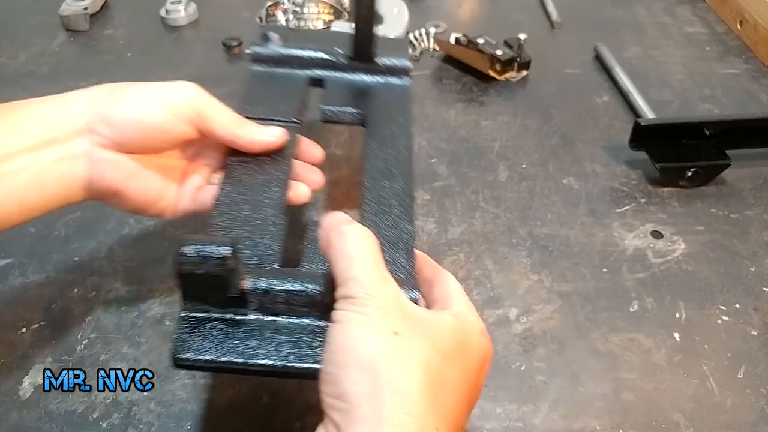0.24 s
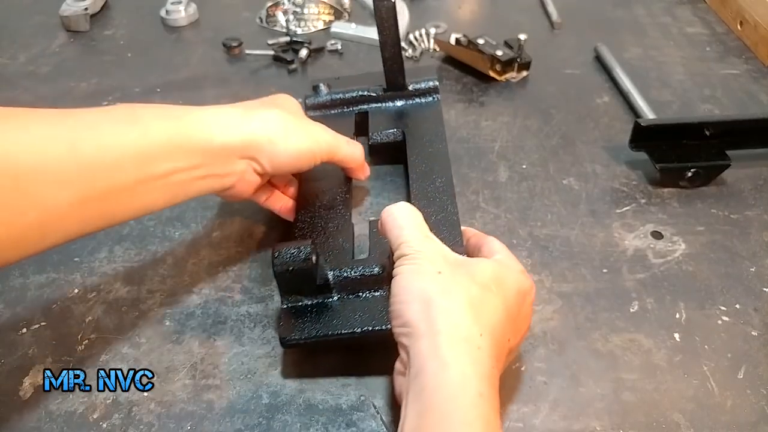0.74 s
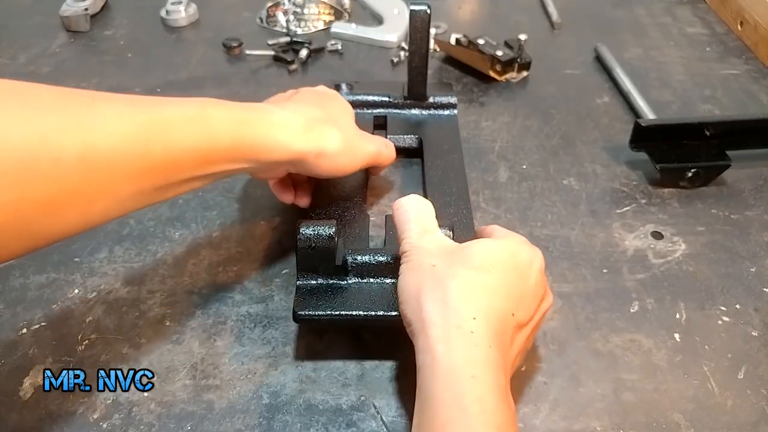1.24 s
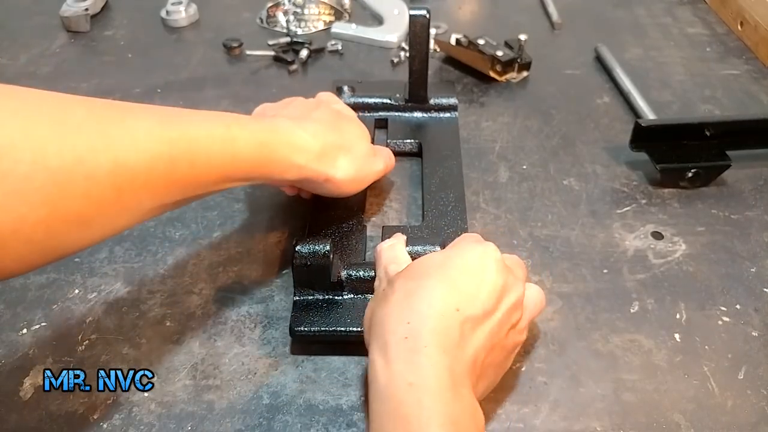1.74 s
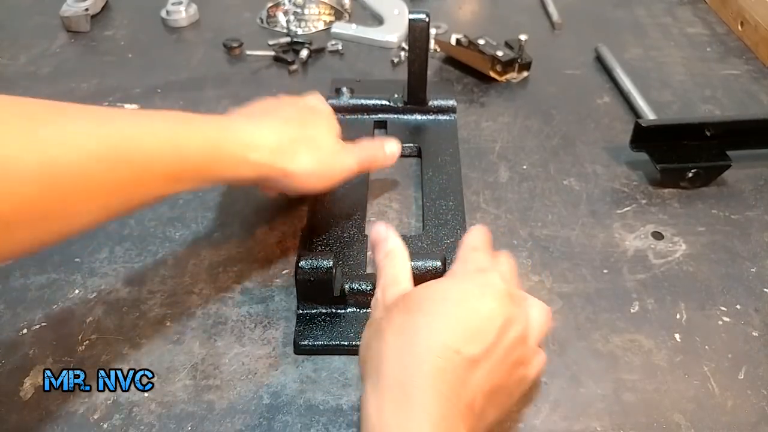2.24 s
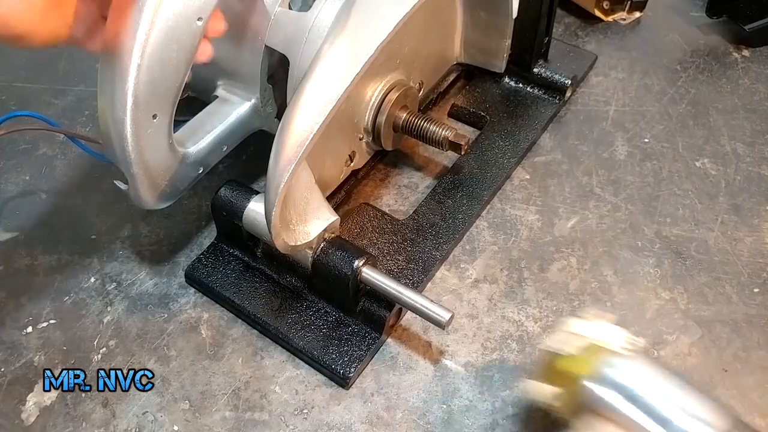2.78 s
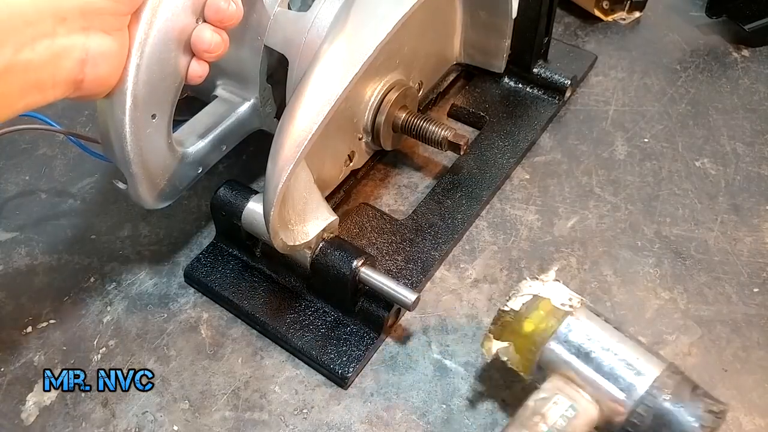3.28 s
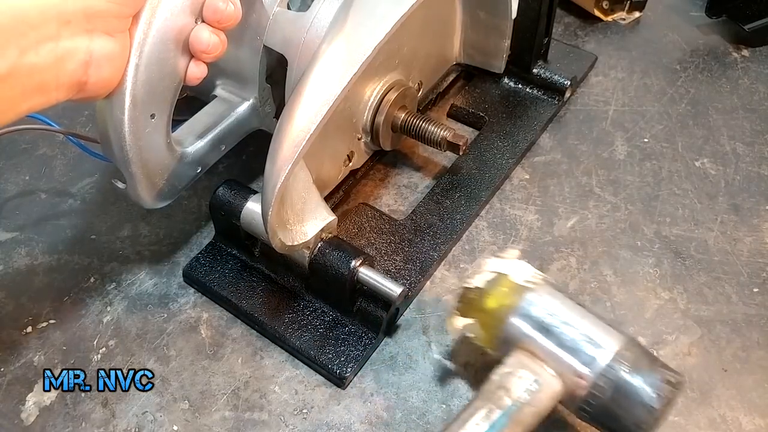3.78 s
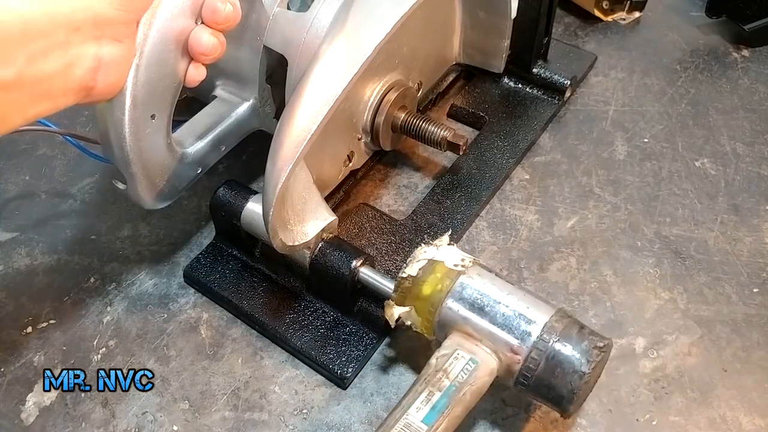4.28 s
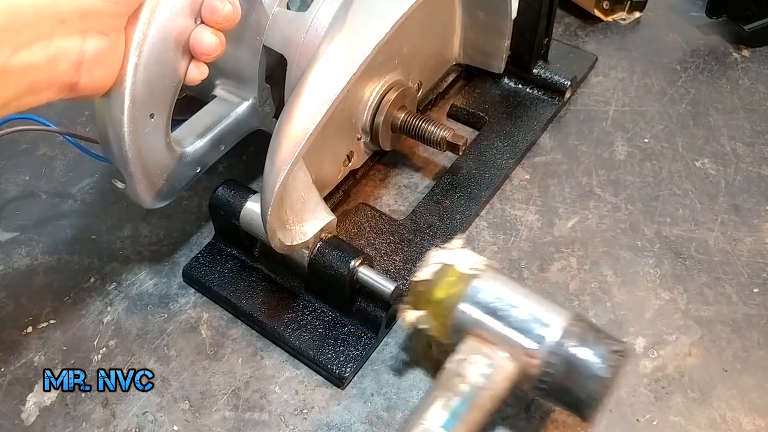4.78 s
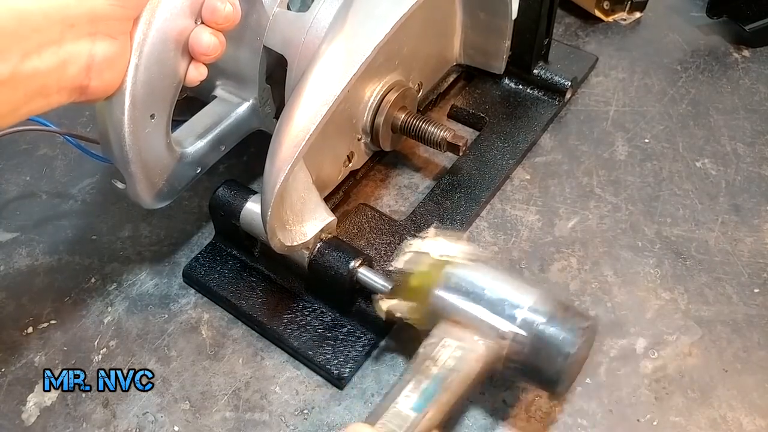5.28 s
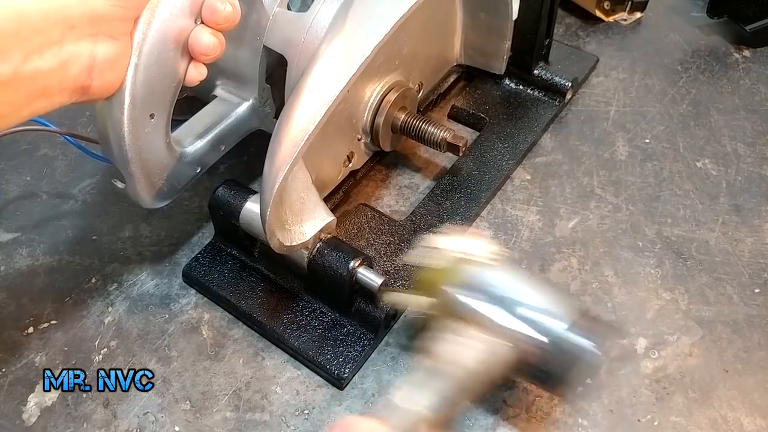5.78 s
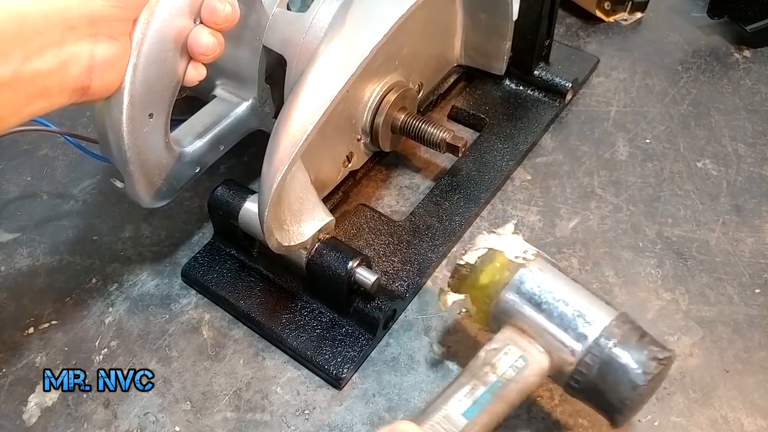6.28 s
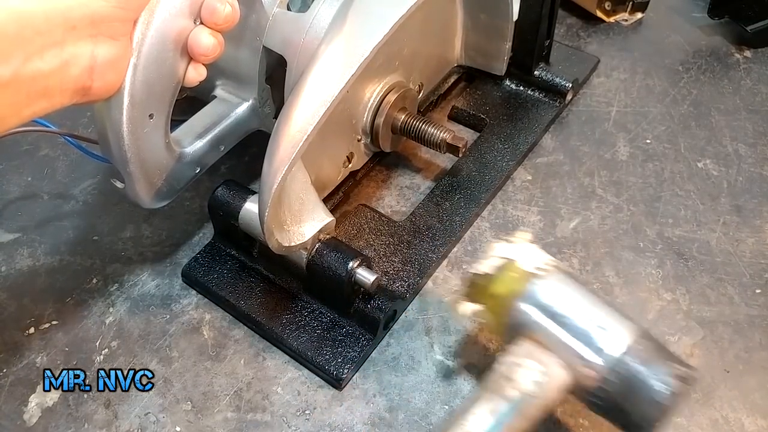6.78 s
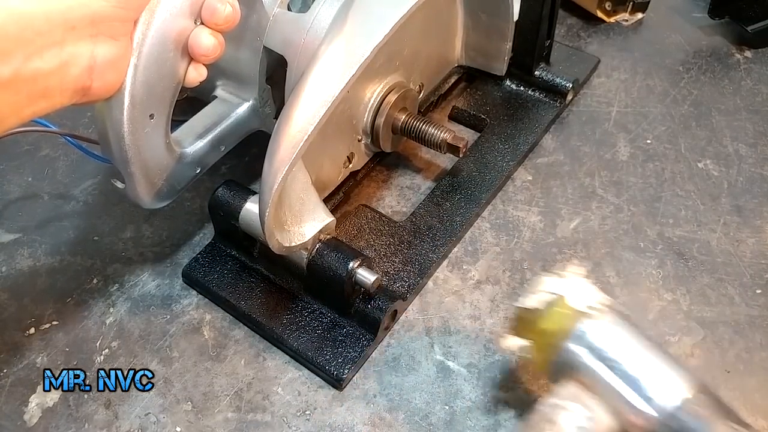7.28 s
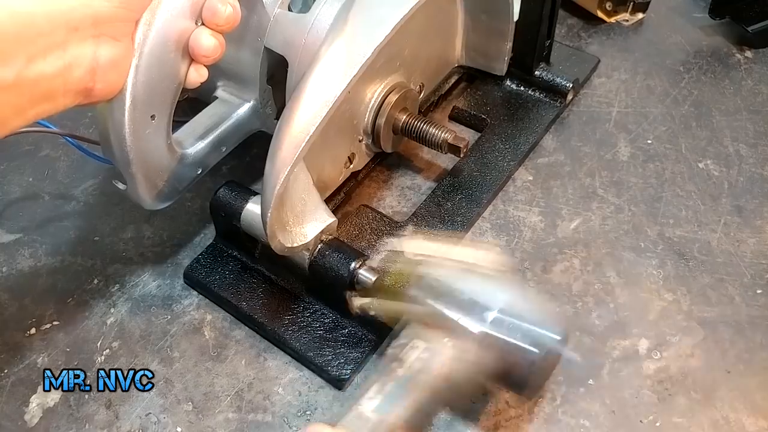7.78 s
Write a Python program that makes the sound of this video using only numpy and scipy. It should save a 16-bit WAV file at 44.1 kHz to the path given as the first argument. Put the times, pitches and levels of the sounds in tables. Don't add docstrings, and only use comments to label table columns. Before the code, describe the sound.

A heavy iron base scrapes and clinks on a gritty bench as a lorry drones past, then a mallet thumps a steel pin in.

```python
import sys
import numpy as np
from scipy import signal
from scipy.fft import rfft, irfft, next_fast_len
from scipy.io import wavfile
from scipy.ndimage import uniform_filter1d, minimum_filter1d, map_coordinates

SR = 44100
rng = np.random.default_rng(int(sys.argv[2]) if len(sys.argv) > 2 else 0)


def how_loud(loudness_db):
    steps = np.asarray(loudness_db, float) / 20
    return 10 ** steps


def wrap_up_sound(samples):
    columns = np.atleast_2d(samples).T
    tamed = np.clip(columns, -1, 1)
    steps = np.round(tamed * 32767).astype(np.int16)
    wavfile.write(sys.argv[1], SR, steps)


N = 354563

# start in seconds, peak in dB, dull thump in dB, bright click in dB.
BLOWS = [(2.927, -20.5, -4, -3), (3.198, -28.5, 8.5, -16), (3.448, -40.5, 20.5, 9), (3.7057, -29, 16, 8),
         (3.9568, -25.5, 16, 17.5), (4.2027, -11.5, 7.5, -4), (4.6547, -12, -1.5, 7.5),
         (5.0453, -13.5, 2.5, 2), (5.334, -14.5, 5, 2.5), (5.6107, -15.5, 2.5, 4), (5.88, -17, 2, 6),
         (6.142, -15, -4, 1), (6.3987, -19.5, 8, 16), (6.6678, -15, 4, 10.5), (7.5416, -16, 1, 12),
         (7.9034, -9, 2, 11.5)]
PAUSE_S = 2.352, 2.392


def at_hz(points, hz):
    point_hz, point_db = np.transpose(points)
    return np.interp(np.log(hz), np.log(point_hz), point_db)


def in_time(rows):
    s, db = np.transpose(rows)
    return np.interp(np.arange(N) / SR, s, db)


def swell(crest_s, crest_db, rise_db_per_s, fall_db_per_s):
    t = np.arange(N) / SR - crest_s
    return crest_db + np.where(t < 0, rise_db_per_s * t, -fall_db_per_s * t)


def coloured(x, spectrum):
    size = next_fast_len(len(x))
    hz = np.maximum(np.arange(size // 2 + 1) * SR / size, 1)
    y = irfft(rfft(x, size) * how_loud(at_hz(spectrum, hz)), size)[:len(x)]
    return y / np.std(y)


def band(x, low_hz, high_hz):
    return signal.sosfilt(signal.butter(2, [low_hz, high_hz], "band", fs=SR, output="sos"), x)


def drift(rate_hz):
    knots = rng.standard_normal(1300)
    return map_coordinates(knots, [np.minimum(np.arange(N) / SR * rate_hz, 1290)], order=3)


def ring(force, hz, t60_s):
    r, w = how_loud(-60 / (t60_s * SR)), 2 * np.pi * hz / SR
    return signal.lfilter([0, np.sin(w)], [1, -2 * r * np.cos(w), r * r], force + 1e-18)


def struck(times_s, levels_db, modes, spread_db, soft=False):
    at, out = np.round(times_s * SR).astype(int), np.zeros(N)
    chance = rng.standard_normal((len(at), len(modes)))
    for k, (hz, mode_db, t60_s) in enumerate(modes):
        force = np.zeros(N)
        force[at] = how_loud(levels_db + mode_db + spread_db * chance[:, k])
        ringing = ring(force, hz, t60_s)
        if soft:
            ringing = ring(ringing, hz, t60_s) * 37 / (t60_s * SR)
        out += ringing
    return out


def pin():
    # Hz, level in dB, t60 in seconds.
    thump_modes = [(463.5, -2, 0.24), (680, 15.5, 0.017), (960, 6, 0.011), (1656, 1, 0.036)]
    knock_modes = [(1850, -9, 0.0079), (2500, 0.5, 0.0055), (3270, -5, 0.0047)]
    loose_modes = [(1730, -1, 0.0073), (2400, -4.5, 0.013), (3600, -11, .01)]
    click_modes = [(4710, -2.5, 0.0055), (5670, -1, 0.0026), (6440, -6, 0.0094), (7950, -5.5, 0.0039),
                   (9060, -12.5, 0.009), (11140, -39.5, 0.0046)]
    loose_blows = 5
    s, db, thump_db, click_db = np.transpose(BLOWS)
    knock_s, knock_db = s + .0003, db + 5
    thump = struck(s, db + thump_db - 15.5, thump_modes, 2.4)
    loose = struck(knock_s[:loose_blows], knock_db[:loose_blows], loose_modes, 2, soft=True)
    knock = struck(knock_s[loose_blows:], knock_db[loose_blows:], knock_modes, 2, soft=True)
    click = struck(s + .001, db + click_db - 4, click_modes, 2, soft=True)
    return thump + loose + knock + click


def base():
    shoved_s = [.96, 1.1658, 1.419, 1.4725, 1.548, 1.86, 1.885, 1.9013, 1.921, 2.1045, 2.119, 2.29, 6.111,
                6.341, 7.865]
    # hiss in dB, length in seconds, grind in dB, bench in dB.
    shoves = [(-41, 0.32, -25, -44), (0.5, .15, -4, -19.5), (-31, 0.053, -55, -34),
              (-15, 0.083, -32, -16.5), (-24.5, 0.087, -55, -24), (-37, 0.2, -40, -48),
              (-31, .015, -60, -60), (-29.5, 0.023, -60, -58), (-30, 0.033, -55, -60),
              (-17.5, 0.033, -50, -39), (-6.5, 0.18, -9.5, -13), (-40, 0.058, -45, -21),
              (-37, .011, -58, -50), (-29.5, 0.057, -57, -44), (-52, 0.038, -37, -55)]
    # start in seconds, hiss in dB, length in seconds,
    # grind above hiss in dB, bench in dB.
    drives = [(2.9254, -20.5, 0.064, 3, -36), (3.199, -27.5, 0.05, 3, -34), (3.449, -28.5, 0.054, 5, -29.5),
              (3.712, -18, 0.088, 3.5, -18), (3.965, -3.5, 0.04, 4, -22), (4.202, -2.5, 0.14, 1, -12.5),
              (4.653, -19.5, 0.1, 8.5, -25), (5.048, -22, .11, 8, -22.5), (5.332, -24.5, 0.097, 10, -24.5),
              (5.613, -27, 0.064, 11, -22.5), (5.882, -27, 0.074, 9.5, -24), (6.144, -12, 0.13, 4.5, -12.5),
              (6.405, -2, 0.13, 0, -12.5), (6.673, 1, 0.12, -0.5, -9.5), (7.545, 8.5, 0.12, -2, -4.5),
              (7.903, 2.5, 0.16, -1.5, -5.5)]
    # Hz, level in dB per Hz.
    hiss_spectrum = [(2060, -10), (3500, -8.5), (4000, -12.5), (5310, -6), (6040, -4.5), (8160, -1.5),
                     (10100, -19.5), (15300, -34), (16200, -37)]
    grind_spectrum = [(120, 9), (200, 0), (241, -10), (736, -11), (1010, -10.5), (1230, -2.5), (2220, -14),
                      (4000, -11.5), (5200, -40), (8800, -120)]
    # Hz, level in dB, t60 in seconds.
    bench_modes = [(104.8, 6.5, 0.27), (133.9, 4, 0.16), (195.3, 3.5, 0.5), (282.5, 2.5, 0.28),
                   (350, 7.5, 0.46), (452, -8, 0.51)]
    casting_modes = [(497.4, -44, 0.16), (775, -38, 0.055), (979, -29, 0.015), (1690, -66, 0.068),
                     (2530, -67, 0.049), (3600, -52, 0.04)]

    t, hiss, grind, drum = np.arange(N) / SR, np.zeros(N), np.zeros(N), np.zeros(N)
    skids = [(s, *row) for s, row in zip(shoved_s, shoves)]
    skids += [(s, db, length_s, db + more_db, drum_db) for s, db, length_s, more_db, drum_db in drives]
    for k, (s, hiss_db, length_s, grind_db, drum_db) in enumerate(skids):
        jolt = min(how_loud(0.17 * hiss_db), 1) if k < len(shoves) else 0.23
        i = slice(round(s * SR), round((s + length_s) * SR))
        since_s = t[i] - s
        rise_s = 0.0061 * (10 * length_s) ** 2
        speed_up = np.clip(since_s / max(rise_s, .001), jolt, 1)
        speed = speed_up * np.clip(1 - since_s / length_s, 0, 1) ** 2.64
        hiss[i] += how_loud(hiss_db) * speed
        grind[i] += how_loud(grind_db) * speed
        drum[i] += how_loud(drum_db) * speed

    grit = rng.standard_normal((3, N)) * how_loud(1.96 * rng.exponential(1, (3, N)))
    bounce = np.sin(2 * np.pi * bench_modes[1][0] * t)
    push = drum * (grit[2] / np.std(grit[2]) + 0.5 * bounce)
    bench = sum(how_loud(db - 48.5) * ring(push, hz, t60_s) for hz, db, t60_s in bench_modes)
    hissing = (1 + 0.091 * bounce) * hiss * coloured(grit[0], hiss_spectrum)
    grinding = grind * coloured(grit[1], grind_spectrum)
    casting = sum(how_loud(db) * ring(grinding, hz, t60_s) for hz, db, t60_s in casting_modes)
    return hissing + grinding + casting, bench


def parts():
    # start in seconds, peak in dB.
    clinks = [
        (1.4192, -30),
        (1.4734, -8),
        (1.8851, -33),
        (1.9013, -28),
        (1.92, -27),
    ]
    # Hz, level in dB, t60 in seconds.
    part_modes = [(3360, -4, 0.022), (4130, -0.5, 0.09), (5340, -6, 0.02), (6460, -4, .02), (7900, 11, .04),
                  (8630, 17, 0.032), (9300, 4, .05), (11300, -15, .04)]
    pin_modes = [(730, -5, .09), (2440, -8, .06), (3490, 3.5, .05), (4230, -16, 0.072), (5030, -6, .06),
                 (7550, -6, .05), (8170, 4, .06), (10400, -4, 0.06)]
    pin_ring_db = [-25, -29.5, -33.5]
    s, db = np.transpose(clinks)
    taps_s = np.array(BLOWS)[:len(pin_ring_db), 0] + .001
    return struck(s, db - 24, part_modes, 4) + struck(taps_s, np.array(pin_ring_db), pin_modes, 3)


def handle():
    # start in seconds, length in seconds, crest as share of length, crest in Hz, level in dB.
    squeaks = [
        (1.35, .036, .5, 12400, -54),
        (3.56, .14, .3, 15400, -60),
        (3.8, .15, .46, 14500, -55),
        (4.06, .122, .7, 14250, -60),
        (5.69, .185, 0.75, 15450, -54),
        (5.972, 0.18, .62, 15050, -54),
    ]
    from_hz, arc_power = 11500, 1.6
    grip_hz, grip_width_hz, grip_db = 13300, 500, 12
    out, waver = np.zeros(N), how_loud(5 * drift(150) - 3)
    for s, length_s, crest, crest_hz, db in squeaks:
        u = np.arange(round(length_s * SR)) / (length_s * SR)
        away = np.where(u < crest, 1 - u / crest, (u - crest) / (1 - crest))
        hz = crest_hz - (crest_hz - from_hz) * away ** arc_power
        grip = np.exp(-((hz - grip_hz) / grip_width_hz) ** 2)
        fade = np.clip(np.minimum(u, 1 - u) * length_s / .01, 0, 1)
        gain = how_loud(db - grip_db * (0.5 - grip)) * fade
        start = round(s * SR)
        out[start:start + len(u)] += gain * np.sqrt(2) * np.sin(2 * np.pi * np.cumsum(hz) / SR)
    return out * waver


def workshop(x):
    # Hz, t60 in seconds.
    room_t60 = [(100, 1), (210, 0.58), (560, 0.41), (1470, 0.36), (3880, 0.33), (9000, 0.23),
                (14000, 0.053)]
    room_db, gap_s = -5.5, 0.001
    tail, white = 0, signal.lfilter(*signal.butter(2, 9000, fs=SR), rng.standard_normal((2, N)))
    edges_hz = 120 * 2 ** np.arange(0, 7.5, .5)
    build = np.exp(-1 / (gap_s * SR))
    for k, (low_hz, high_hz) in enumerate(zip(edges_hz, edges_hz[1:])):
        keep = how_loud(-120 / (at_hz(room_t60, np.sqrt(low_hz * high_hz)) * SR))
        poles = np.polymul([1, -keep], [1, -build])
        power = signal.lfilter([(1 - keep) * (1 - build)], poles, band(x, low_hz, high_hz) ** 2 + 1e-18)
        noise = band(white[k % 2], low_hz, high_hz)
        tail = tail + np.sqrt(np.abs(power)) * noise / np.std(noise)
    return x + how_loud(room_db) * tail


def engine():
    drone_hz = 232 - 11 * np.arange(N) / SR
    drone_db = swell(0.79, -34.5, 8.5, 12)
    whine_hz = np.full(N, 7750)
    whine_db = swell(1.54, -44.5, 11, 24) - 4
    out = 0
    for hz, db, waver_hz in [(drone_hz, drone_db, 22.0), (whine_hz, whine_db, 350)]:
        waver = drift(waver_hz) + 1j * drift(waver_hz)
        out = out + how_loud(db) * np.real(waver * np.exp(2j * np.pi * np.cumsum(hz) / SR))
    return out * (np.arange(N) < PAUSE_S[0] * SR)


def hum():
    # crest in seconds, level in dB, rise in dB per second.
    overtones = [
        (1.78, -37, 8.5),
        (1.62, -35.5, 11.5),
        (1.89, -33, 48),
    ]
    mains_hz, on_s, off_s, dies_db_per_s = 99, 0.66, 2.02, 146.5
    t, out = np.arange(N) / SR, 0
    running_db = -dies_db_per_s * (np.maximum(t - off_s, 0) + np.maximum(on_s - t, 0))
    for k, (crest_s, crest_db, rise_db_per_s) in enumerate(overtones):
        db = swell(crest_s, crest_db, rise_db_per_s, 14) + running_db + 4.3 * drift(7.29)
        out = out + np.sqrt(2) * how_loud(db) * np.sin(2 * np.pi * (k + 2) * mains_hz * t)
    return out


def background():
    # Hz, level in dB per Hz.
    spectrum = [(15, -34), (25, 1.5), (87, -3.5), (111, -18), (149, -8.5), (180, -18.5), (427, -22.5),
                (463, -24), (863, -28), (1040, -26.5), (2760, -33.5), (3160, -33.5), (3720, -40),
                (7310, -36.5), (16000, -54)]
    # time in seconds, level in dB.
    near = [(0, -6.5), (.4, -8), (.62, -2), (.85, -2.5), (1.2, 0.5), (1.45, -0.5), (1.75, -2), (2.0, -3.5),
            (2.35, 3)]
    # time in seconds, level in dB.
    lull = [(2.9, -3), (3.4, -3.5), (4.5, 0.5), (5.0, -2.5), (5.8, -0.5), (6.9, 3), (7.2, -2), (8.04, 6.5)]
    # level with the lorry near in dB, share of its swing, level in the lull in dB.
    ranges = [
        (-37, 0.83, -43),
        (-28.5, 0.99, -44),
        (-37, 1.03, -52.5),
        (-50.5, 0.28, -51),
        (-60, .1, -60.5),
    ]
    patchy_db = [1.0, .8, .5, .3, .3]
    edges_hz = [25, 110, 600, 4000, 9500, 18000]
    bass_back_s, bass_held_db, bass_surge_db = 2.57, -13, 7.5

    out, t = 0, np.arange(N) / SR
    near_db, lull_db = in_time(near), in_time(lull)
    resume_db = np.minimum(-10.5 + 33 * (t - PAUSE_S[0]), 0)
    surge_db = bass_surge_db * np.exp(2 * (bass_back_s - t)) - resume_db
    bass_db = np.where(t < bass_back_s, bass_held_db, surge_db)
    for k, (low_hz, high_hz) in enumerate(zip(edges_hz, edges_hz[1:])):
        loud_db, share, quiet_db = ranges[k]
        before_db = loud_db + share * near_db
        after_db = quiet_db + resume_db
        if k < 2:
            after_db = after_db + lull_db
        if k == 0:
            after_db = after_db + bass_db
        if k == 2:
            before_db = before_db - 3.5 * np.maximum(t - 0.89, 0)
        level_db = np.where(t < PAUSE_S[0], before_db, after_db) + patchy_db[k] * drift(5.3)
        part = band(coloured(rng.standard_normal(N), spectrum), low_hz, high_hz)
        out = out + how_loud(level_db) * part / np.std(part)
    return out


def scene():
    t, (pause_s, resume_s) = np.arange(N) / SR, PAUSE_S
    skid, bench = base()
    no_bass = signal.butter(3, 230.0, "high", fs=SR, output="sos")
    small = signal.sosfilt(no_bass, pin() + skid + parts())
    bench_lag = round(0.00818 * SR)
    work = workshop(small) + np.pad(bench, (bench_lag, 0))[:N]
    work = work * ((t < pause_s) | (t > BLOWS[0][0] - .01))
    whole = work + handle() + engine() + background() + hum()
    mic = signal.butter(6, 40.0, "high", fs=SR, output="sos")
    change = round(pause_s * SR)
    whole = np.concatenate([signal.sosfilt(mic, whole[:change]), signal.sosfilt(mic, whole[change:])])
    fade_out = np.clip((pause_s - t) / .002, 0, 1)
    fade_in = np.clip((t - pause_s) / (resume_s - pause_s), 0, 1) ** 2
    return (whole * (fade_out + fade_in))[None]


def band_limit(x):
    return signal.sosfilt(signal.butter(12, 16470, fs=SR, output="sos"), x)


def record(dry):
    top_hz = 15800
    dry = signal.sosfilt(signal.cheby2(10, 30, top_hz * 1.01, fs=SR, output="sos"), dry)
    over_db = np.maximum(20 * np.log10(np.abs(dry[0]) + 1e-9) + .15, 0)
    fall_db = 900 * np.arange(N) / SR
    held_db = np.maximum.accumulate(over_db + fall_db) - fall_db
    ahead_db = -minimum_filter1d(-held_db, size=45)
    limited = dry * how_loud(-uniform_filter1d(ahead_db, size=45))
    return band_limit(np.clip(limited, -1, 1))


dry = scene()
out = record(dry)
wrap_up_sound(out)
```